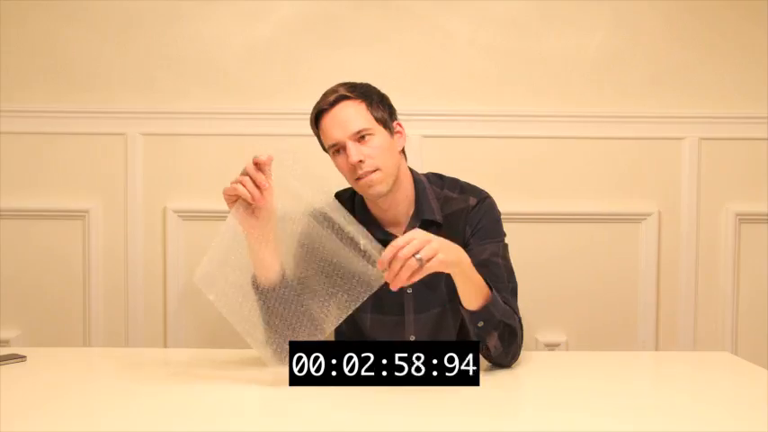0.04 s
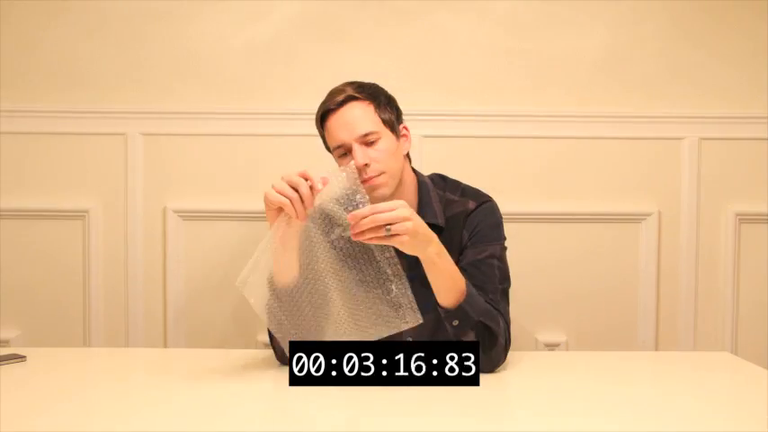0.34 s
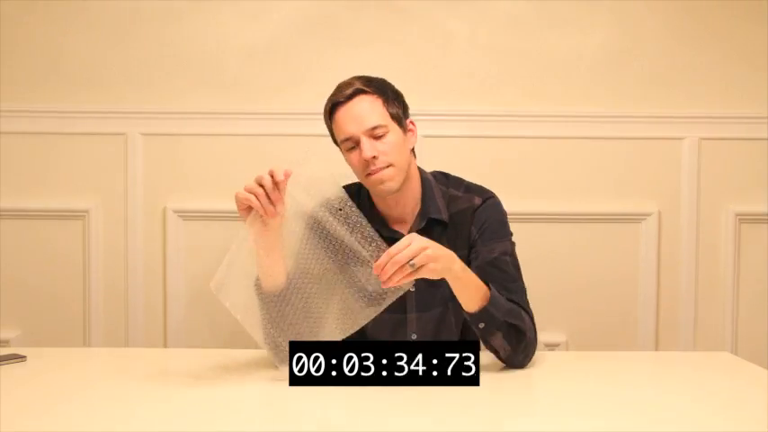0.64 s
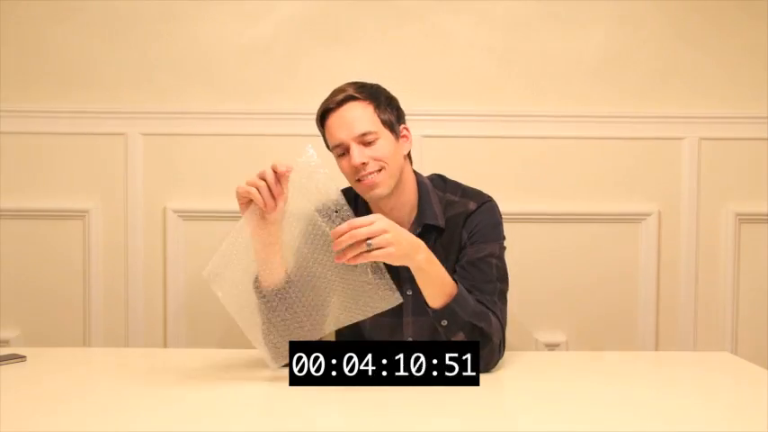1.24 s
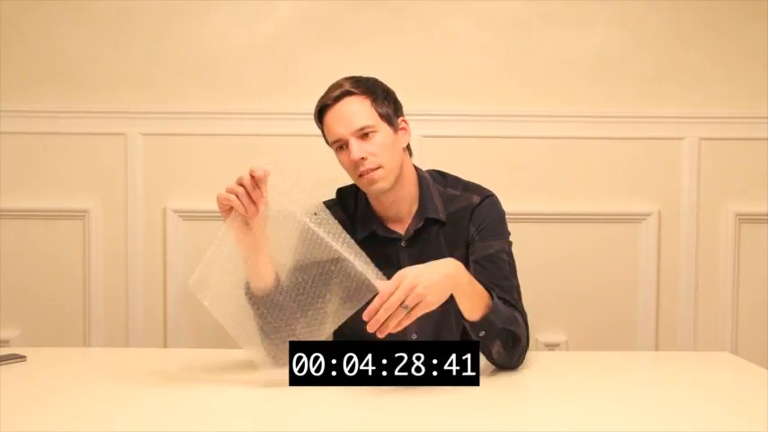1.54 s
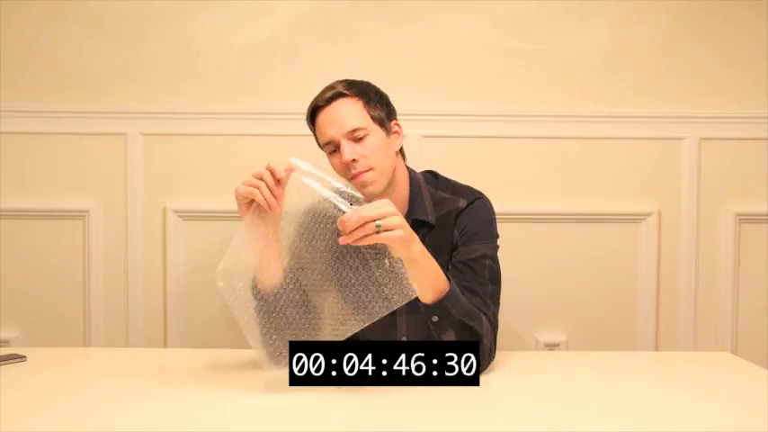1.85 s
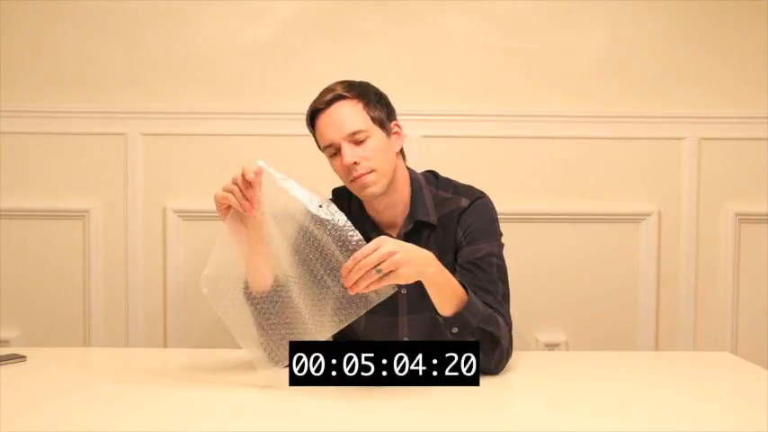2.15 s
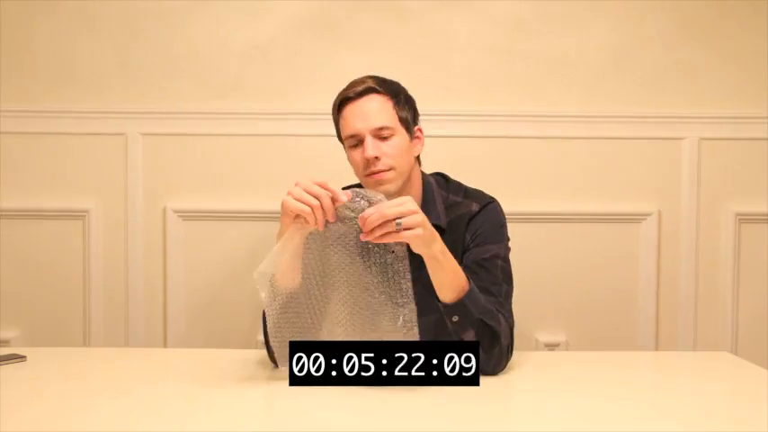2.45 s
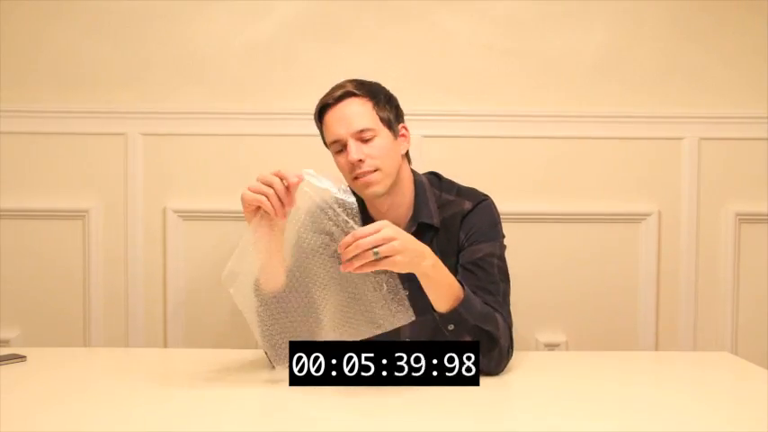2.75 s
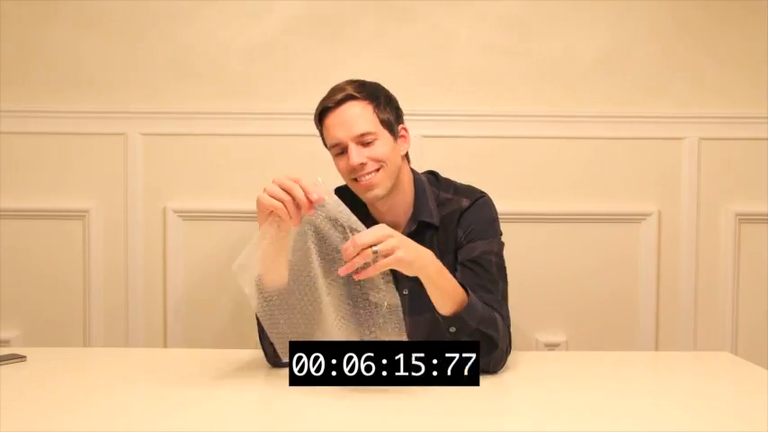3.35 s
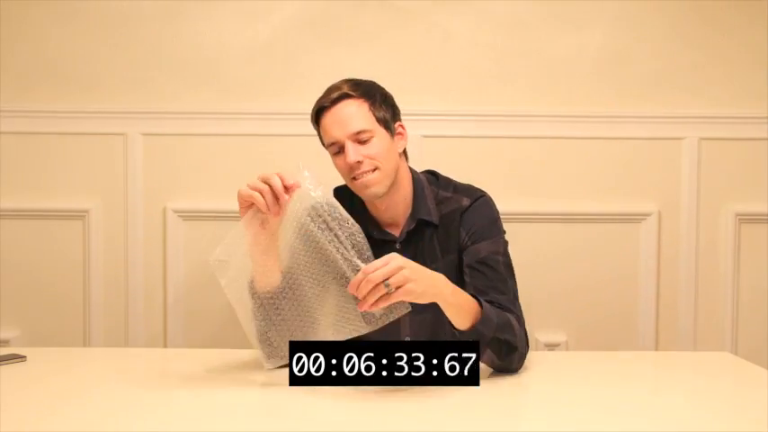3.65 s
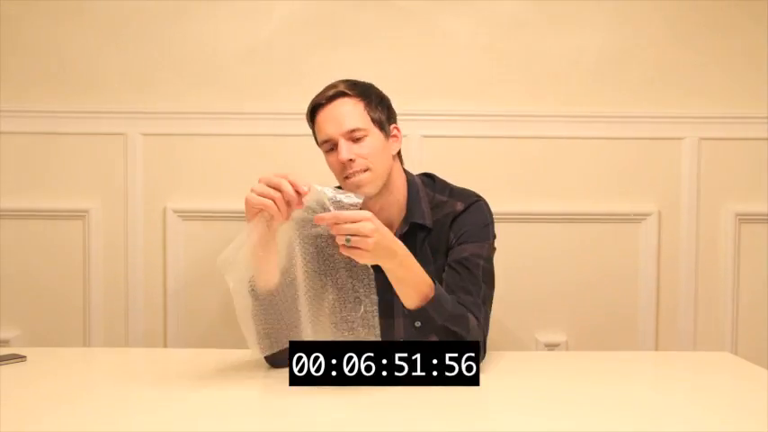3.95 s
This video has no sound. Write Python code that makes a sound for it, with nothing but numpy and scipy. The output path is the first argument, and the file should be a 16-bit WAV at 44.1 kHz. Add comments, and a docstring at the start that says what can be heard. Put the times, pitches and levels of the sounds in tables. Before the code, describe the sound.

Bubble wrap pops in a fast, even run of sharp cracks, each with a short hollow ring. The plastic ticks and rustles faintly between pops, close to the microphone in a quiet room.

```python
"""Bubble wrap popped close to one microphone in a quiet room with a faint hum and hiss.
From the first moment the bubbles burst, about nine a second: each a crack of tearing film, a puff of
escaping air and a short, hollow ring of the room. Between pops the sheet ticks and rustles in the
fingers, and a few faint rising squeaks are heard. The popping skips a beat near 1.5 s, then runs on
to the end at 4 s."""
import sys
import numpy as np
from scipy import signal
from scipy.fft import rfft, irfft, next_fast_len
from scipy.io import wavfile

SR = 44100
rng = np.random.default_rng(int(sys.argv[2]) if len(sys.argv) > 2 else 0)


def put_to_file(sound):
    """Save the sound as 16-bit audio at rate SR, in the file named by the first command-line argument."""
    columns = np.atleast_2d(sound).T  # one column per channel
    safe = np.clip(columns, -1, 1)
    whole_steps = np.round(safe * 32767)
    wavfile.write(sys.argv[1], SR, whole_steps.astype(np.int16))


N = 176400
SIZE, LEAD = 4096, 128  # samples in one short event, and ahead of a crack's onset
HZ, T = np.fft.rfftfreq(SIZE, 1 / SR), np.arange(SIZE) / SR


def amp(db):
    """Decibels to gain."""
    return 10 ** (np.asarray(db) / 20)


def unit(x):
    """Scaled to rms 1."""
    return x / np.sqrt(np.mean(x ** 2) + 1e-20)


def along(points, hz):
    """A curve through (Hz, value) points, read on a log frequency axis."""
    freqs, values = np.transpose(points)
    return np.interp(np.log(hz + 1), np.log(freqs + 1), values)


def filtered(x, response):
    """x shaped by a gain that depends on frequency."""
    padded = next_fast_len(N + SR // 2)
    return irfft(rfft(x, padded) * response(np.fft.rfftfreq(padded, 1 / SR)), padded)[:N]


def coloured(x, points):
    """x shaped by (Hz, dB) points, at rms 1."""
    return unit(filtered(x, lambda hz: amp(along(points, hz))))


def causal(db):
    """The minimum-phase response that has these gains on the HZ grid."""
    cepstrum = irfft(np.log(amp(db)))
    cepstrum[1:SIZE // 2] *= 2
    cepstrum[SIZE // 2 + 1:] = 0
    return np.exp(rfft(cepstrum))


def add(track, start_s, sound, lead=0):
    """Mix a sound in at a time, starting lead samples early."""
    first = max(round(start_s * SR) - lead, 0)
    part = track[first:first + len(sound)]
    part += sound[:len(part)]


# The hiss of the room. Each row: frequency in Hz, relative level in dB.
HISS_SPECTRUM = [(18, -43.5), (30, -1.5), (81, -23.5), (328, -16), (499, -18.5), (584, 3.5), (666, -6.5),
                 (1040, -15), (1190, -7.5), (1320, -10), (2230, -12), (2540, -6.5), (2980, -9.5),
                 (3580, -6.5), (5900, -20), (13700, -12), (16000, -12.5)]
# The hum behind the sheet. Each row: frequency in Hz, rms level in dB, half-width in Hz.
HUM_LINES = [(146, -98.5, 16), (585, -85, 26), (752, -91.5, 88), (1180, -82.5, 2.4), (1656, -88.5, 4),
             (2160, -97.5, 3.3), (2490, -87.5, 4), (2636, -81.5, 9.1), (3000, -103, 2.49), (3455, -84, 10),
             (3700, -79, 90)]

def room_tone(hiss_db=-75, tone_hz=1188, tone_db=-76.5, tone_stop_s=2.47):
    """The room itself: faint hiss, narrow unsteady hum lines and one stronger tone that stops."""
    t = np.arange(N) / SR
    out = amp(hiss_db) * coloured(rng.standard_normal(N), HISS_SPECTRUM)
    for hz, db, width in HUM_LINES:
        line = filtered(rng.standard_normal(N), lambda f: 1 / (1 + ((f - hz) / width) ** 2))
        out += amp(db) * unit(line)
    tone = amp(tone_db) * unit(np.sin(2 * np.pi * tone_hz * t))
    fade = np.clip((tone_stop_s - t) / 0.038, 0, 1)
    return out + tone * fade


# Faint squeaks. Each row: start and length in seconds, first and last pitch in Hz, peak level in dB.
SQUEAKS = [(0.743, 0.045, 2480, 2660, -66), (1.069, .022, 2470, 2660, -63), (3.835, .036, 2110, 2900, -58)]

def squeaks():
    """Thin tones that swell and glide upwards."""
    out = np.zeros(N)
    for start, length, first_hz, last_hz, db in SQUEAKS:
        hz = np.linspace(first_hz, last_hz, int(length * SR))
        add(out, start, amp(db) * np.hanning(len(hz)) * np.sin(2 * np.pi * np.cumsum(hz) / SR))
    return out


# Hands bumping the sheet. Each row: start in seconds, length in seconds, level in dB.
HAND_BUMPS = [(0.387, 0.0115, -70), (0.438, 0.019, -62.5), (0.944, 0.0078, -63), (1.017, 0.037, -64),
              (1.149, 0.017, -63), (1.56, 0.023, -62), (1.583, 0.096, -68), (1.907, .04, -72),
              (3.407, 0.02, -65)]
# Their dull colour. Each row: frequency in Hz, relative level in dB.
BUMP_SPECTRUM = [(30, -15), (90, -10), (150, -2), (300, -9), (600, 4), (800, -3), (1300, -24), (3000, -12),
                 (8000, -45.5)]

def hand_bumps():
    """Soft, brief thuds of the hands taking a new grip."""
    level = np.zeros(N)
    for start, length, db in HAND_BUMPS:
        add(level, start, amp(db) * np.hanning(int(length * SR)))
    return level * coloured(rng.standard_normal(N), BUMP_SPECTRUM)


# Constant handling of the sheet. Each row: time in seconds, relative level in dB.
HANDLING = [(0.0, -76), (0.17, -73.5), (0.37, -69.5), (0.83, -70.5), (1.01, -69), (1.35, -71.5),
            (1.87, -68), (1.99, -63.5), (2.13, -76), (2.28, -67.5), (2.41, -70.5), (2.53, -79), (2.75, -79),
            (3.1, -74), (4.0, -75)]
# The sheet sliding through the fingers. Each row: start and length in seconds, relative level in dB.
SLIDES = [(1.915, 0.043, -54.5), (2.02, 0.07, -72), (2.365, 0.1, -63)]
# The colour of the rustling plastic. Each row: frequency in Hz, relative level in dB.
SHEET_SPECTRUM = [(100, -16), (600, -0.5), (1200, 2.5), (2500, -5.5), (5000, -2), (8000, -7), (11000, -1),
                  (13700, 2), (16000, -5)]

def rustle(crinkles_per_s=530, spread_db=4.5, crinkle_db=-2.5, rub_db=-6.5):
    """Fine crinkles and rubbing, swelling when the fingers slide or let go after each pop."""
    level = amp(np.interp(np.arange(N) / SR, *np.transpose(HANDLING)))
    releases = [(pop[0] + 0.022, 0.036, -73.5) for pop in POPS]  # same columns as SLIDES
    for start, length, db in list(SLIDES) + releases:
        add(level, start, amp(db) * np.hanning(int(length * SR)))
    sizes = amp(spread_db * np.minimum(rng.exponential(size=N), 4))
    onsets = rng.random(N) < crinkles_per_s / SR
    envelope = signal.fftconvolve(sizes * onsets, np.exp(-T / 0.0005))[:N]
    crinkles = amp(crinkle_db) * coloured(envelope * rng.standard_normal(N), SHEET_SPECTRUM)
    rubbing = amp(rub_db) * coloured(rng.standard_normal(N), SHEET_SPECTRUM)
    return level * (crinkles + rubbing)


# How fast the room's reflections die. Each row: frequency in Hz, seconds to fall by 60 dB.
REFLECTION_T60 = [(200, 0.034), (2000, 0.024), (6000, 0.042), (14000, 0.023)]
REFLECTION_DELAY_S = 0.0007  # behind the direct sound at the microphone

def reflections(colour_db):
    """Sound scattered back by the room, each frequency dying at its own speed."""
    hz, t, noise = signal.stft(rng.standard_normal(SIZE), SR, nperseg=64)
    decay = amp(-60 * t / along(REFLECTION_T60, hz)[:, None])
    tail = signal.istft(noise * decay, SR, nperseg=64)[1][:SIZE]
    return irfft(rfft(tail / np.linalg.norm(tail)) * causal(colour_db))


# The room's resonances. Each row: frequency in Hz, relative level in dB, seconds to fall by 60 dB.
ROOM_MODES = [(378, -58, 0.012), (486, -55.5, 0.075), (534.4, -51.5, 0.059), (761, -39.5, 0.053),
              (780.6, -46, 0.072), (880, -53, 0.015), (1058, -48.5, 0.018), (1449, -54.5, 0.045),
              (2410, -45, 0.02), (4050, -53.5, 0.016), (4861, -60.5, .035), (5900, -45.5, 0.022)]

def room_ring(attack_s=0.00035, scatter_db=2.1):
    """The hollow ring of the room's modes, struck a little differently by each pop."""
    ring = np.zeros(SIZE)
    for hz, db, t60 in ROOM_MODES:
        envelope = amp(db + rng.normal(0, scatter_db) - 60 * T / t60)
        ring += envelope * np.sin(2 * np.pi * hz * T)
    return ring * (1 - np.exp(-T / attack_s))


def film_crack(colour_db, decay_s, evenness=0.67, gate_s=0.005):
    """Plastic film tearing or snapping: a very short noise burst, its onset LEAD samples in."""
    spectrum = rfft(rng.standard_normal(SIZE) * np.exp(-T / decay_s))
    spectrum /= (np.abs(spectrum) + 1e-9) ** evenness  # flatten chance peaks and dips
    spectrum /= np.sqrt(np.mean(np.abs(spectrum) ** 2))
    burst = np.roll(irfft(spectrum * causal(colour_db)), LEAD)
    return burst * np.exp(-((T - LEAD / SR) / gate_s) ** 2)


# Creases snapping between the pops. Each row: start in seconds, relative level in dB.
CREASE_TICKS = [(0.3906, -35), (0.4649, -38), (0.4965, -35.5), (1.0921, -29.5), (1.2701, -35.5),
                (1.5706, -35.5), (1.6421, -31.5), (1.6918, -30), (1.712, -29), (1.7368, -29.5),
                (1.9206, -17.5), (2.1909, -30.5), (2.2233, -24), (2.2624, -29), (2.2688, -25.5),
                (2.2977, -35), (2.3923, -34.5), (2.426, -36), (2.6252, -31), (2.7486, -39), (2.847, -43.5),
                (3.154, -30), (3.2179, -38), (3.3138, -39), (3.435, -34), (3.5331, -27.5), (3.6377, -30)]
# Their bright colour. Each row: frequency in Hz, relative level in dB.
TICK_SPECTRUM = [(200, -22), (700, -12), (2000, -12), (5000, -10), (8500, -3.5), (11000, 0), (14000, 4.5),
                 (16500, -14)]

def crease_ticks(gain_db=4.5, reflected_db=-9):
    """Small snaps of the creased sheet, each followed by weaker reflections."""
    out = np.zeros(N)
    for start, db in CREASE_TICKS:
        colour = gain_db + db + along(TICK_SPECTRUM, HZ)
        add(out, start, film_crack(colour, decay_s=0.00061), LEAD)
        add(out, start + REFLECTION_DELAY_S, reflections(colour + reflected_db))
    return out


def air_puff(push_s=0.00014, pull_s=0.00048, rebound_s=0.0044, gain_db=-3):
    """Escaping air: a pressure spike, a longer suction and a slow rebound as the air flows back."""
    def lobe(peak_s):
        return T / peak_s * np.exp(1 - T / peak_s)
    blast = lobe(push_s) ** 1.44 - 0.68 * lobe(pull_s) ** 2.47
    rebound = lobe(rebound_s) ** 5
    backflow = 0.72 * blast.sum() * rebound / rebound.sum()  # 72 % of the moved air returns
    return amp(gain_db) * (blast - backflow)


# The colour of the tearing film. Each row: frequency in Hz, relative level in dB.
FILM_SPECTRUM = [(60, -31), (400, -4), (1000, -1.5), (1900, -12), (2400, -2), (2700, -4), (3100, -10),
                 (3750, -5), (4000, -3.5), (4250, 2.5), (4560, -8.5), (4780, -1.5), (5000, -5), (5200, -2),
                 (5800, -3.5), (6150, -8.5), (7000, -5), (8100, 2), (9200, -1.5), (10700, -8),
                 (12300, -5.5), (14000, 0), (15500, -8), (16500, -18.5)]
# The colour of a pop coming back from the room. Each row: frequency in Hz, relative level in dB.
REFLECTION_SPECTRUM = [(100, -23), (500, 6), (1100, 4.5), (1900, 0), (3100, -5), (4200, 3), (6200, -8.5),
                       (7500, -2.5), (10500, -0.5), (13800, 7.5), (15500, 0), (16500, 2.5)]
# The bubbles bursting at the microphone. Each row: start in seconds; crack gain at 8 kHz in dB;
# its body (2.4 kHz), snap (4-5.5 kHz) and sparkle (12.5 kHz up) in dB against that gain;
# ring, reflection and puff gains in dB; +1 for pressure first or -1 for suction first.
POPS = [(0.047, -14, 14, 15.5, 5.5, -2.2, -19.5, -36.5, 1), (0.1556, -13.5, 11.5, 8, 7.6, -3, -24, -39, 1),
        (0.2748, -10, 8, 8.5, 8.5, -7.5, -19, -36, 1), (0.4163, -5.5, 6, -5.5, 7.5, -14, -24.5, -33, 1),
        (0.533, -6, 1.5, -1, 11, -14, -22, -29, 1), (0.6527, -6, -20, 3.5, 5.1, -9, -22, -10.5, 1),
        (0.7872, -5, -5.5, 5, 4, -28, -23.5, -16.5, 1), (0.906, -0.5, -3, 1.3, -2.5, -7.2, -21.5, -50, 1),
        (1.0108, -2.5, 0.8, -0.5, -9, -7, -21.5, -10.5, 1),
        (1.1247, -3.5, -9, -1.5, 4.0, -3, -23, -15.5, -1),
        (1.2214, -7, -9, -1.5, 5, -4.5, -26.5, -19.5, -1), (1.3329, -5.5, -0.5, 7, -3, -4.5, -22, -26, -1),
        (1.4602, -7, 5.5, 6, 4.0, -26, -22, -9, 1), (1.6806, -9, -0.5, 4.5, 8, -12, -26, -48, 1),
        (1.7878, -10, 1.5, 4, 9.5, -15.5, -31.5, -58, 1),
        (1.8955, -1.5, 1.5, -3.5, -1.5, 1.5, -19, -34.5, 1),
        (2.0083, -8.5, -9, -1.5, 2.3, 1, -30, -20.5, -1), (2.113, -1, -1, -4.5, -5.6, 2.5, -22.5, -5, 1),
        (2.229, 1, -2, -2.5, -4, -3.7, -26, -43, 1), (2.3403, -8, -3, 6, 3.5, -6.5, -20, -8.5, 1),
        (2.4544, -7.5, 8, 2, 2.5, 1.8, -22, -47.5, 1), (2.591, -1.5, -1.5, -2.5, 2, -6.5, -18, -35, 1),
        (2.6993, -0.3, -4, -2.5, -5, 3, -22.5, -34.5, 1), (2.8128, 3.5, -7, -8, 0, -1, -21.5, -35.9, 1),
        (2.921, 0, -9.5, -0.4, -4, 0.3, -21.5, -36.5, 1), (3.0395, 3.5, -3, -3.5, 0.8, -2.7, -18, -38.5, 1),
        (3.1706, -2, -6, -1.7, 3, -14, -21, -38.1, 1), (3.2763, -7, 1, 6.5, 2.5, -0.5, -25, -23.5, -1),
        (3.3934, -8.5, -5.5, 2.5, 8.5, -10, -23.5, -22, -1),
        (3.4927, -15, 14, 15, 11, -3.5, -23.5, -37.5, 1),
        (3.6011, -11.5, 11, 11.5, 10.5, -0.2, -21, -31.5, 1),
        (3.705, -17, 16.5, 14.5, 14, 1.2, -22, -34.6, 1),
        (3.8125, -10.5, 11.5, 9, 3.0, 0.5, -20.5, -47.5, 1),
        (3.918, -15.5, 15, 5, 9, -14.5, -26.5, -30.5, 1)]

def bubble_pops(crack_gain_db=-1, low_db=-11, reflection_gain_db=2.5):
    """Each bubble bursts: the film cracks, the air puffs out, the room rings and reflects."""
    out = np.zeros(N)
    for start, db, body_db, snap_db, sparkle_db, ring_db, reflected_db, puff_db, sign in POPS:
        tilt = [(900, low_db + 0.05 * db), (2400, db + body_db), (4000, db + snap_db),
                (5500, db + snap_db), (7200, db), (9800, db), (12500, db + sparkle_db)]
        crack_colour = crack_gain_db + along(FILM_SPECTRUM, HZ) + along(tilt, HZ)
        room_colour = reflection_gain_db + reflected_db + along(REFLECTION_SPECTRUM, HZ)
        add(out, start, film_crack(crack_colour, decay_s=0.00045), LEAD)
        add(out, start, sign * amp(puff_db) * air_puff() + amp(ring_db) * room_ring())
        add(out, start + REFLECTION_DELAY_S, reflections(room_colour))
    return out


def scene():
    """The sheet up close and the room behind it, at one microphone."""
    return (bubble_pops() + crease_ticks() + rustle() + hand_bumps() + squeaks() + room_tone())[None]


def record(dry):
    """A mono recorder that cuts off steeply above its band limit."""
    top_hz = 16400
    return filtered(dry[0], lambda hz: 1 / np.sqrt(1 + (hz / top_hz) ** 200))[None]


dry = scene()
out = record(dry)
put_to_file(out)
```